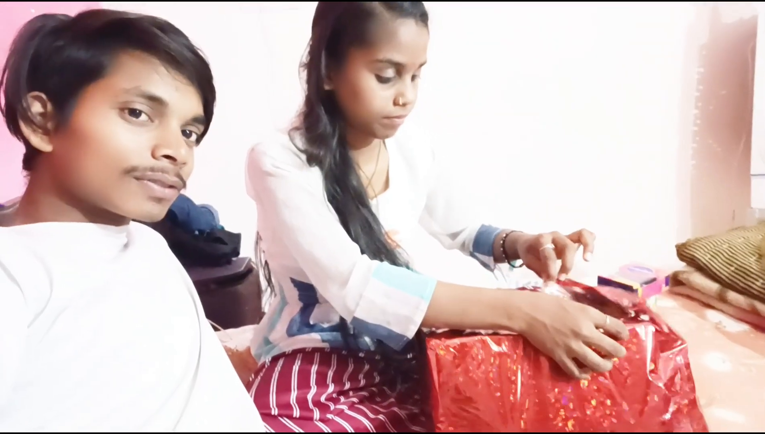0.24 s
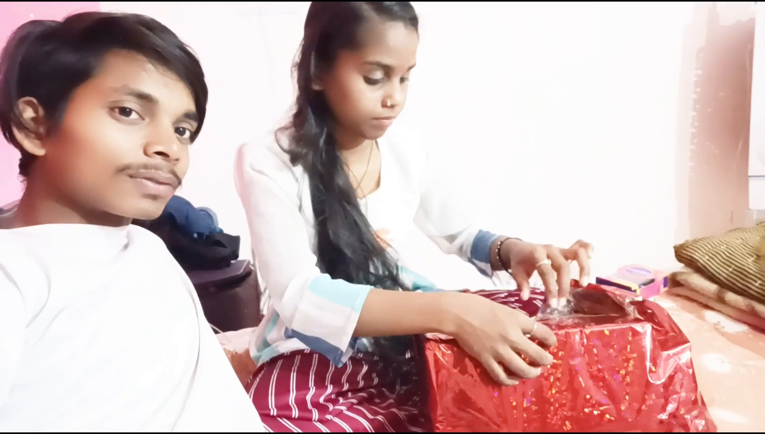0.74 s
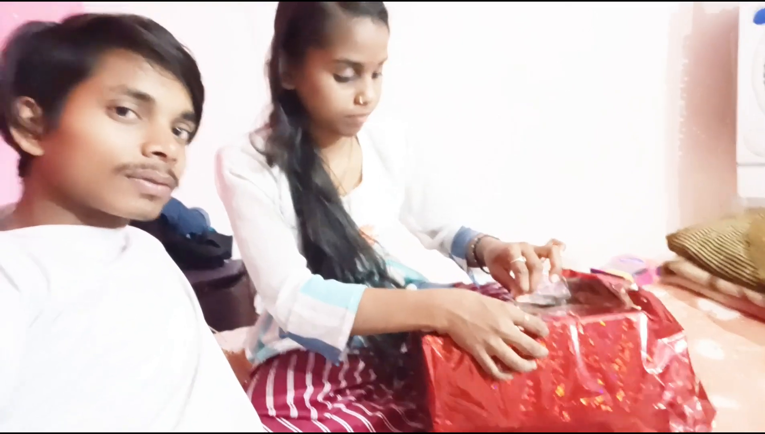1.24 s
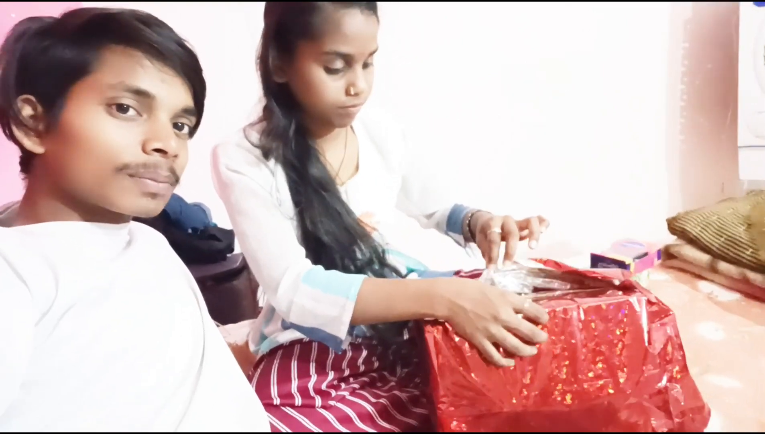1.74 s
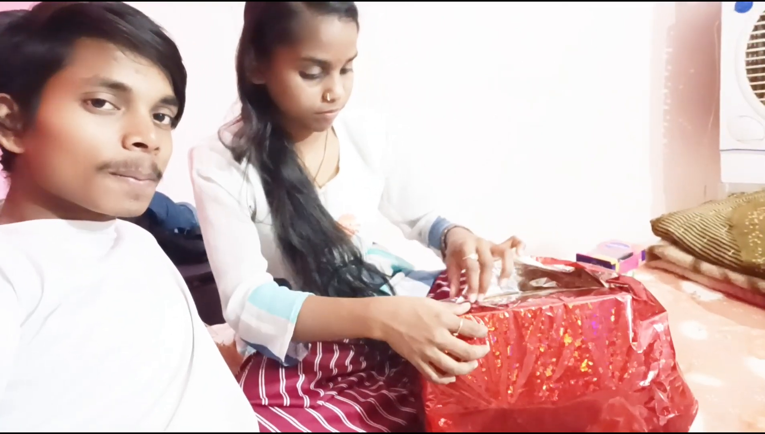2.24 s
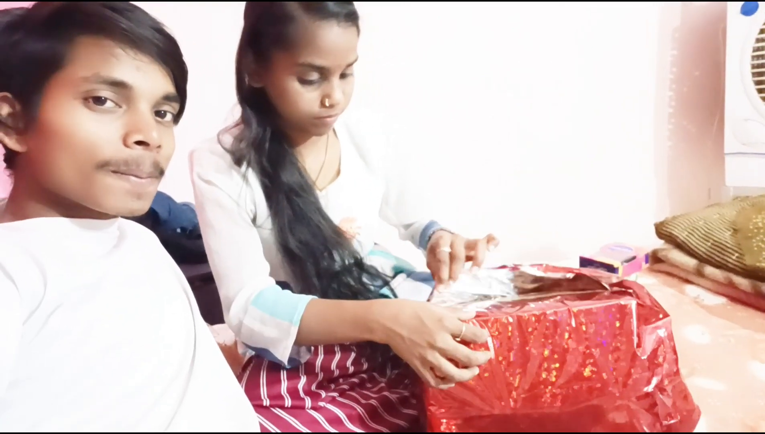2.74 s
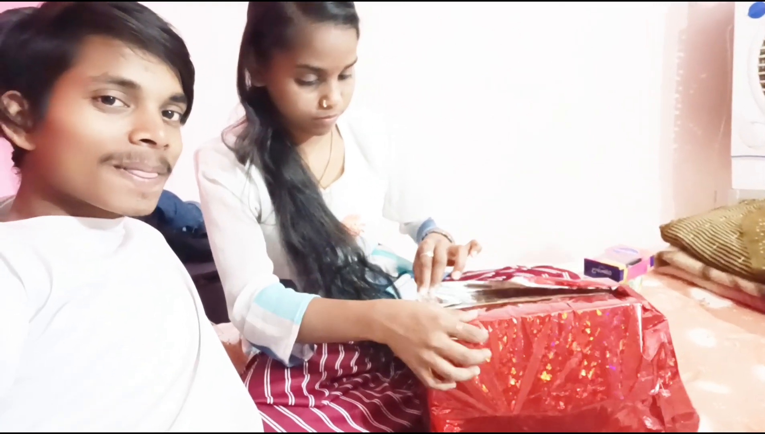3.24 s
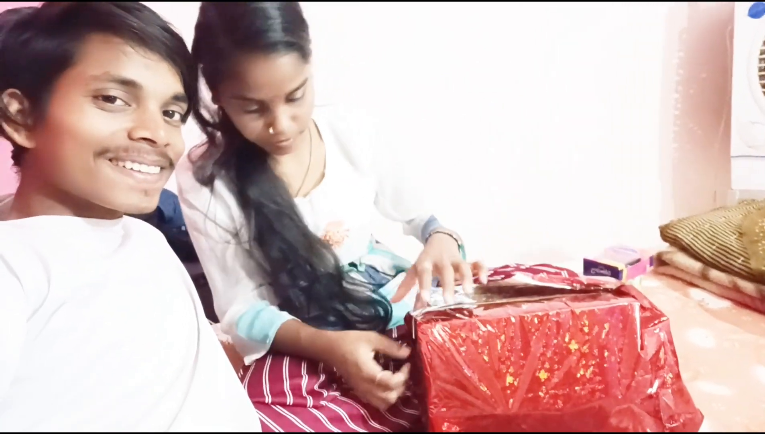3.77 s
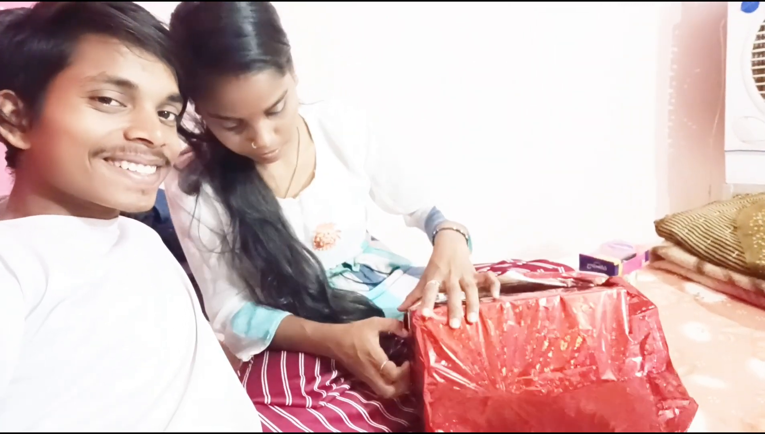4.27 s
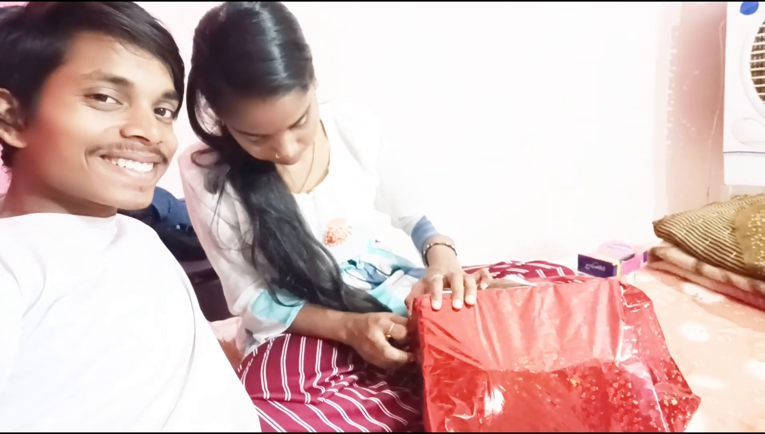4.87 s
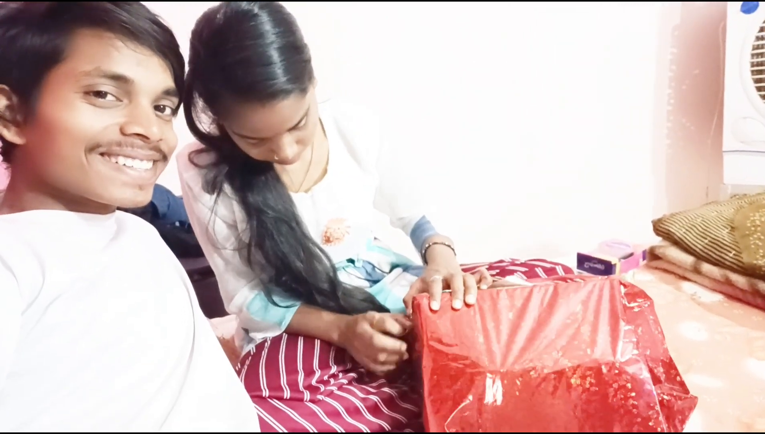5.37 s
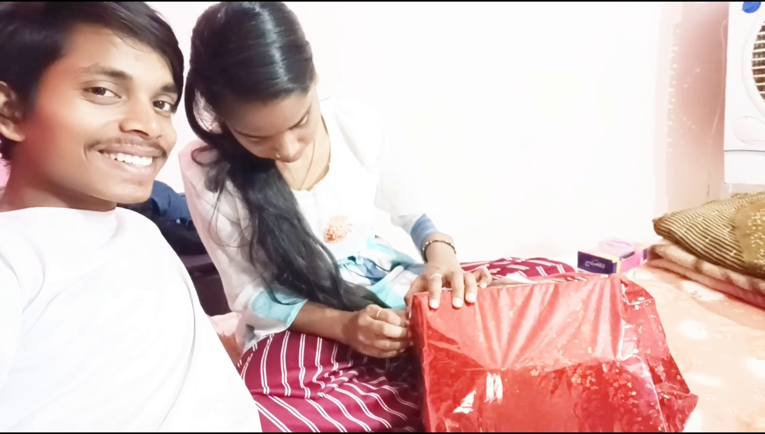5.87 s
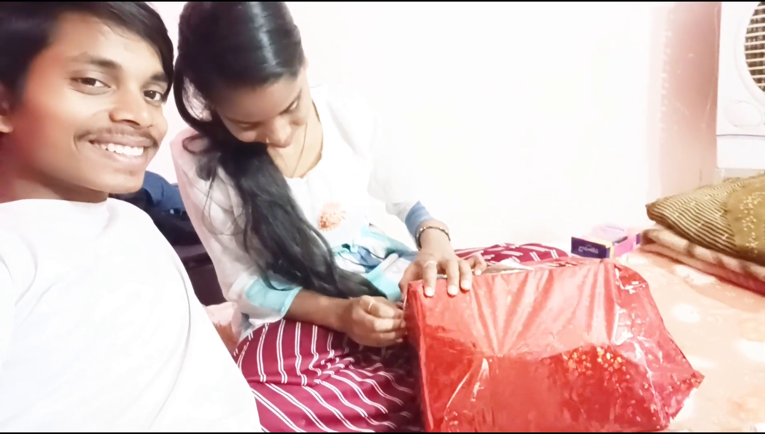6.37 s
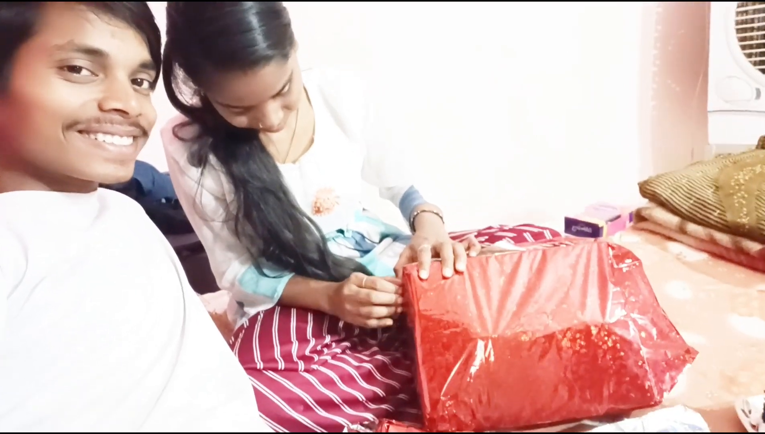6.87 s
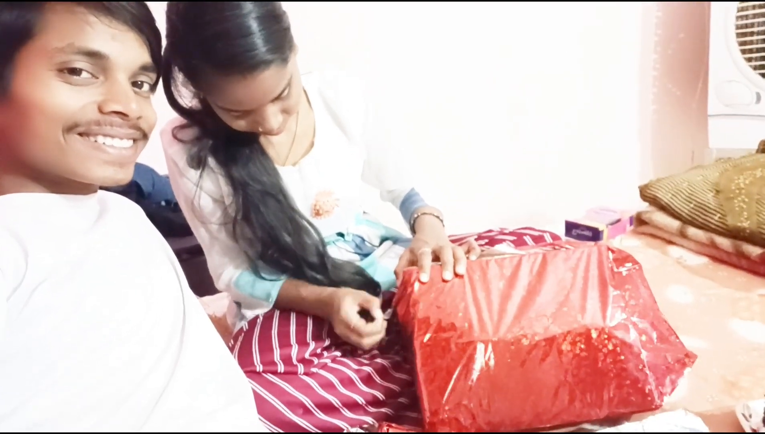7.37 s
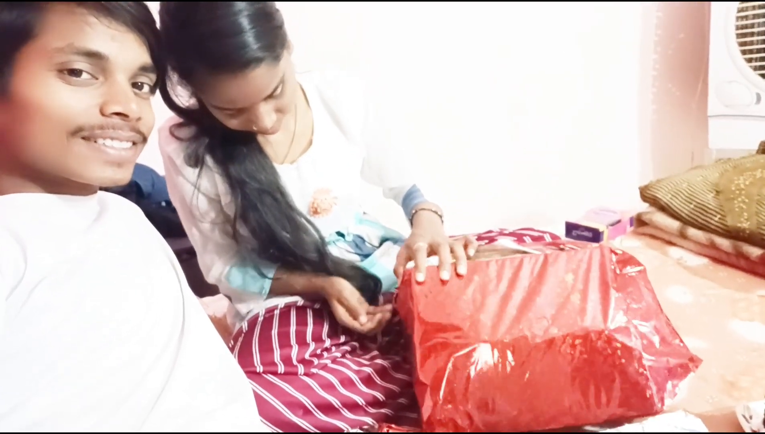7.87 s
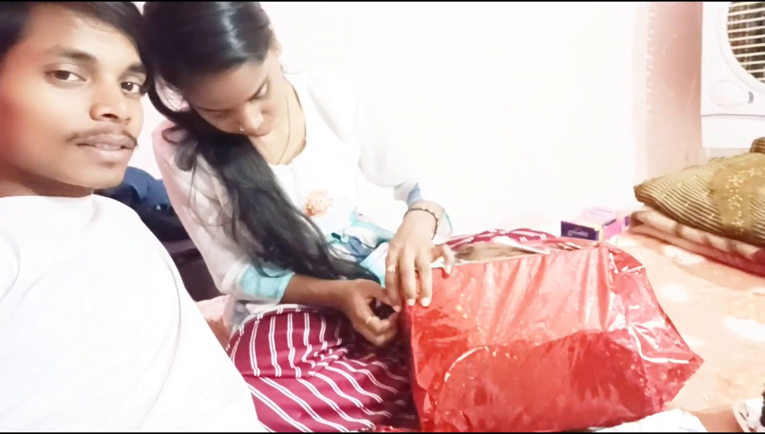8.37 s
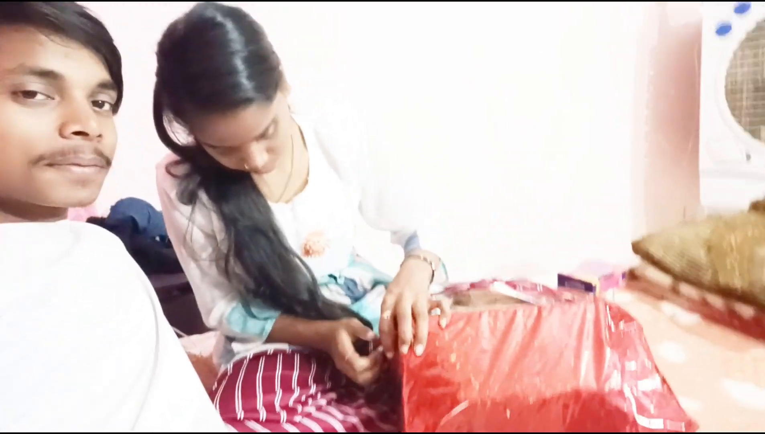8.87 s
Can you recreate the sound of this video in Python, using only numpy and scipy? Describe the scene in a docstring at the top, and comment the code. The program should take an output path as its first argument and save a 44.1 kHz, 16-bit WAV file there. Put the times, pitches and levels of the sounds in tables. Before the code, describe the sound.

Close stereo phone pickup, slightly stronger on the right: crisp metallic wrap crackles in bursts separated by near-quiet gaps. Creases pop brightly, loose flaps boom softly, taut film gives tiny squeaks around two and a half seconds, and the box bumps on soft bedding. The middle is thin and quiet; sharp snaps erupt at five, six and seven and a half seconds, each leaving a short bright echo from bare walls.

```python
"""Foil crackles finely and snaps loudly, tape rasps, and a box drums and bumps in a ringing bare room. Hands
pull metallic gift wrap off a cardboard box, to the right of a phone with two microphone ports. Crackle, snaps
and tape are bursts of short noisy clicks; tape ripped off the box sends random ticks into panel tones. Flexing
flaps boom, taut film squeaks, and the box thuds on the bedding; the walls ring for about half a second, over
faint room air and hiss."""
import sys
import numpy as np
from scipy import signal
from scipy.fft import rfft, irfft, next_fast_len
from scipy.io import wavfile
from scipy.ndimage import uniform_filter1d, map_coordinates

SR = 44100
rng = np.random.default_rng(int(sys.argv[2]) if len(sys.argv) > 2 else 0)


def digitize_waveform(pressure):
    """Quantize a signal to 16-bit integers and store it at the path in sys.argv[1].

    Rows of a 2-D input are taken as channels; values are limited to [-1, 1].
    """
    field = np.atleast_2d(pressure).T
    bounded = np.clip(field, -1, 1)
    quanta = np.round(bounded * 32767).astype(np.int16)
    wavfile.write(sys.argv[1], SR, quanta)


N = 402182  # length in samples
REST_DB = -82.5  # relative level at rest: resting hands still stir the wrap


def amp(db):
    """Turn decibels into a plain multiplier."""
    return 10 ** (np.asarray(db) / 20)


def unit(x):
    """Scale a sound to an average (RMS) level of 1."""
    return x / np.sqrt(np.mean(x ** 2) + 1e-20)


def along(points, hz):
    """Read a curve given as (Hz, value) points, with pitch spaced as the ear hears it (log axis)."""
    f, value = np.transpose(points)
    return np.interp(np.log(hz + 1), np.log(f + 1), value)


def curves(rows):
    """Join the rows with straight lines: one value per sample for each column after the time."""
    s, *columns = np.transpose(rows)
    return [np.interp(np.arange(N) / SR, s, column) for column in columns]


def wobble(rate):
    """Make a smooth random curve with so many random knots a second."""
    knots = rng.standard_normal(int(N * rate / SR) + 4)
    return map_coordinates(knots, [np.arange(N) * rate / SR])


def swell(u):
    """A quick rise and a slower fall over u = 0..1, top near 1."""
    return 1.25 * np.sqrt(np.sin(np.pi * u) * (1 - u) + 1e-12)


def filtered(x, response):
    """Change strength and timing of each frequency by a complex response."""
    m = next_fast_len(N + SR // 2)
    return irfft(rfft(x, m) * response(np.fft.rfftfreq(m, 1 / SR)), m)[..., :N]


def coloured(x, points, size=1024):
    """Shape the tone by (Hz, dB) points, with a filter that never sounds ahead of its input."""
    gain = amp(along(points, np.fft.rfftfreq(size, 1 / SR)))
    # folding the cepstrum packs the filter's energy at its start (minimum phase)
    cepstrum = irfft(np.log(gain))
    cepstrum[1:size // 2] *= 2
    cepstrum[size // 2 + 1:] = 0
    kernel = irfft(np.exp(rfft(cepstrum)))
    return signal.oaconvolve(x, kernel[None], axes=1)[:, :x.shape[1]]


def ticks(rate, spread_db):
    """Random impulses, rate a second: sizes vary in dB, and mean power is about 1."""
    size = amp(spread_db * np.minimum(rng.exponential(size=N), 3.5)) * rng.choice([-1, 1], N)
    happens = rng.random(N) < rate / SR
    return unit(happens * size / np.sqrt(rate))


def efforts(rows, attack_s, ease_db_per_s, release_db_per_s):
    """Events rise, ease and die away: their joint level, and their traits averaged by power."""
    t = np.arange(0, N, 64) / SR  # one step every 64 samples
    start, hold, db, *traits = np.transpose(rows)[..., None]
    age = np.maximum(t - start, 0)
    fall_db = ease_db_per_s * age + release_db_per_s * np.maximum(age - hold, 0)
    power = (np.minimum(age / attack_s, 1) * amp(db - fall_db)) ** 2
    total = power.sum(0) + amp(REST_DB) ** 2
    mean_traits = [(power * trait).sum(0) / total for trait in traits]
    return curves(np.column_stack([t, 10 * np.log10(total)] + mean_traits))


def buckle(hz, ring, t60, flutter_db, size=700):
    """One facet flips: a crack, a short ring at its pitch, then the sheet around it flutters."""
    t = np.arange(size) / SR
    onset = 1 - np.exp(-t / 0.00022)
    tone = np.sin(2 * np.pi * hz * t) * amp(-60 * t / t60)
    # partly shared by the two ports, partly separate
    noise = rng.standard_normal(size) + 1.06 * rng.standard_normal((2, size))
    crack = noise * (amp(-60 * t / .002) + amp(flutter_db - 60 * t / .018))
    x = ring * unit(tone * onset) + unit(crack * onset)
    return unit(x) / np.sqrt(size)


def patchy(x, depth_db, width_hz, life):
    """The sheet's resonances come and go as it changes shape."""
    hz, t, z = signal.stft(x, SR, nperseg=512)
    knots = rng.standard_normal((300, 900))
    place = np.meshgrid(np.sqrt(hz * 1000) / width_hz, t / life, indexing="ij")
    field = map_coordinates(knots, place, mode="wrap")
    depth = depth_db / (1 + hz / 8000)  # the treble has too many modes to stand out
    return signal.istft(z * amp(depth[:, None] * field), SR, nperseg=512)[1][:, :N]


def crackle(count=18):
    """Small facets buckle at random, more in louder swells; slack sheet rustles, taut sheet sizzles."""
    # swells of crackle, some from hands, some lingering after loud snaps: start t/s, hold/s,
    # relative crackle level/dB, low rustle of slack sheet/dB, treble lift of taut sheet/dB
    crackle_swells = [(-0.02, 0.043, -44.5, -1, -0.5), (0.037, 0.49, -38.5, -1.5, -0.5),
                      (0.672, 0.021, -45, -14, -0.5), (0.865, 0.037, -61, -20, 2.5),
                      (1.165, 0.16, -53, -30, -1.5), (1.305, 0.41, -33.5, -15.5, 0),
                      (1.75, 0.16, -36.5, -11.5, -2), (1.93, 0.19, -47, -27, 1.5),
                      (2.39, 0.011, -58.5, -18, 6.5), (2.48, .05, -61.5, -3.5, 3.5),
                      (2.555, .08, -45, -10, -1.5), (2.675, 0.29, -33.5, -4.5, -0.5),
                      (3.03, 0.063, -27, -5, -1.5), (3.15, 0.23, -37.5, -10, -2),
                      (3.45, 0.088, -41, -26.5, -5.5), (4.01, 0.021, -63, 0, 8),
                      (4.122, 0.027, -51, -11, -3.5), (4.265, 0.19, -49.5, -13, 0),
                      (4.44, 0.43, -43, -10.5, 0), (4.935, 0.046, -40, -8.5, 4), (5.035, .03, -39.5, -8, 3),
                      (5.085, .16, -35, -6.5, 6.5), (5.32, 0.24, -39, -7, 2), (5.745, 0.12, -49, -13, 4),
                      (5.915, 0.042, -42.5, -16.5, -2), (6.03, 0.073, -38.5, -5, 5.5),
                      (6.18, 0.17, -43.5, -17.5, 0.5), (6.44, .02, -50.5, -18, 4),
                      (6.52, 0.14, -41.5, -16, 0), (6.815, 0.03, -39, -3, -2), (7.28, .04, -67.5, -8, 7),
                      (7.368, .03, -42, -0.5, -2), (7.41, .17, -30, -3, 0.5),
                      (7.63, 0.11, -28.5, -14.5, -2.5), (7.865, 0.051, -42.5, -12, -5),
                      (8.035, 0.036, -33, 0, -12.5), (8.2, 0.19, -49.5, -32, -1),
                      (8.42, .1, -51.5, -25, -4.5), (8.56, 0.11, -44.5, -26, -4.5),
                      (8.79, 0.24, -45, -7, -14), (9.09, 0.045, -43, -2.5, -9)]
    # colour of the fine crackle: f/Hz, gain/dB
    foil_colour = [(100, -30), (300, -42.5), (550, -9.5), (900, -7), (1400, 0), (2100, -0.5), (3200, -1),
                   (5600, -2), (10000, -2), (15500, 1)]
    # colour of the broad folds: f/Hz, gain/dB
    rustle_colour = [(120, -32.5), (300, -7), (480, -1.5), (600, -6), (800, -2), (1100, -1), (1500, -4.5),
                     (2200, -9.5), (4000, -14.5)]
    level_db, slack_db, taut_db = efforts(
        crackle_swells, attack_s=0.02, ease_db_per_s=10, release_db_per_s=168.5)
    rate = 1000 * amp(.25 * (level_db + 39.5))  # flips a second, all pitches together
    facets = np.zeros((2, N))
    for hz in np.linspace(2900, 6400, count):
        facet = buckle(hz, ring=0.33, t60=0.004, flutter_db=-14.5)
        flips = ticks(rate / count, spread_db=4.0)
        facets += signal.oaconvolve(flips[None], facet, axes=1)[:, :N]
    rustle = amp(slack_db) * unit(coloured(facets, rustle_colour))
    sheet = unit(coloured(facets, foil_colour)) + rustle
    treble = filtered(sheet, lambda hz: hz ** 4 / (hz ** 4 + 4500 ** 4))
    sheet = sheet + (amp(taut_db) - 1) * treble
    sheet = patchy(sheet, depth_db=4.5, width_hz=85, life=.035)
    return sheet * amp(level_db + 1.2 * wobble(45) + 1.04)


def pop(hz, ring, t60, flutter_db, flutter_t60, size=700):
    """A big crease flips: one sharp swing, a short ring, then the flutter of the sheet around it."""
    t = np.arange(size) / SR
    wave = np.sin(2 * np.pi * hz * t)
    swing = wave * amp(-60 * t / 0.0028)
    tone = wave * amp(-60 * t / t60)
    noise = rng.standard_normal(size) + 0.96 * rng.standard_normal((2, size))
    crack = noise * (amp(-60 * t / .003) + amp(flutter_db - 60 * t / flutter_t60))
    return unit(ring * (unit(swing) + 0.49 * unit(tone)) + unit(crack)) / np.sqrt(size)


def snaps(size=700):
    """Each crease beams its pitch at the phone and scatters a less tonal crack to the walls."""
    # single creases popping through: t/s, relative level/dB, facet pitch f/Hz,
    # body at 900 Hz/dB, edge at 11 kHz/dB
    creases = [(0.0444, -19, 3120, -2, 12), (0.329, -19.5, 3220, 9, 13.5), (0.6815, -24.5, 3140, -7, 0),
               (1.3052, -12, 5230, -3, 4.5), (1.3893, -12.5, 1880, 1.5, 7.5), (1.5713, -16.5, 5170, 7.5, 8),
               (1.6269, -19.5, 5090, 12.5, 11), (1.766, -17, 2230, -4, 3), (1.862, -23, 5960, 0.5, 15),
               (2.6253, -23.5, 3090, 2, -1), (2.6587, -24, 3740, 6, -4), (2.6842, -16, 5100, 4, 11),
               (2.8655, -19, 5280, 10, 0), (2.9106, -16.5, 3070, -4, 10), (2.9774, -17, 3260, -8, 1),
               (3.022, -8, 3040, 12.5, 10), (3.482, -19.5, 3210, -18, 11), (3.5692, -20.5, 3250, -18, -9),
               (4.2707, -36.5, 3370, -17, 8.5), (4.3324, -34, 3280, -9, 7), (4.4607, -26, 5930, 0, 12),
               (4.6084, -40, 2930, -12, 1), (4.804, -31, 3500, 13, 8), (4.8967, -22, 3040, 2, 3),
               (4.9581, -18, 5900, 3, 8.5), (5.032, -6, 6330, -1.5, 1.5), (5.089, -4, 3500, -7, -3),
               (5.19, -6, 3250, 3, -10), (5.3146, -7, 3500, -10, 1), (5.8715, -30, 3080, -7, 4),
               (5.9256, -25.5, 2900, -1, 4), (6.027, -8, 6100, -4.5, 6), (6.1988, -11, 5930, -10, 3.5),
               (6.314, -28, 5360, -9, -3.5), (6.361, -21, 3200, -19, -8), (6.5336, -27.5, 3320, -14.5, 1),
               (6.553, -25.5, 3080, -11, 3), (6.5967, -26.5, 2980, -3.5, -7), (6.6882, -29, 5570, -4, 7),
               (6.7643, -31, 3280, -20, 3.5), (6.814, -5, 3160, -4, -5.5), (6.824, -23, 5800, 7, 4),
               (7.1953, -43, 6450, -7.5, 6), (7.379, -24.5, 3550, 6, 13.5), (7.3932, -12, 6060, -3, 3),
               (7.4074, -10.5, 3160, 5.5, 6), (7.4107, -5, 6060, -24, 5), (7.435, -6.5, 3120, -11, 5),
               (7.4392, -7, 3260, -19, 8), (7.4653, -6, 3600, -2, 2), (7.4853, -9, 3170, -12, 3),
               (7.492, -12, 3190, -2, -2), (7.5119, -9.5, 3820, 3, -8), (7.7116, -12, 3140, -9, 7),
               (7.827, -16.5, 3060, -5, -4), (7.887, -16, 3080, -1, 3), (8.0358, -4.5, 3960, 3, -4),
               (8.5624, -18.5, 2460, -13.5, -8), (8.5903, -21.5, 3250, -6, -1), (8.7385, -29, 3250, -26, 4),
               (8.777, -21, 3280, -18, 0), (8.8062, -21.5, 3060, -3, -1), (8.8158, -22.5, 6140, -4, 11.5),
               (8.8516, -6.5, 3350, -2, -2), (8.8971, -14, 2940, 8.5, 1), (8.9057, -14.5, 3400, 8, -15)]
    beam_db, scatter_db = 13.5, 11  # added towards the phone and towards the walls
    bass_under_body_db = -29.5  # level at 120 Hz against the body
    flip_s = 0.00023  # time constant of a crease flipping
    beamed, scattered = np.zeros((2, 2, N + SR))
    flip = 1 - np.exp(-np.arange(size) / SR / flip_s)
    for s, db, hz, body_db, edge_db in creases:
        bass_db = body_db + bass_under_body_db
        tilt = [(120, bass_db), (900, body_db), (2800, 0.00052), (6000, 0), (11000, edge_db)]
        near = pop(hz, ring=.4, t60=.008, flutter_db=-12, flutter_t60=.022)
        near = coloured(near, tilt) * flip
        wide = pop(hz, ring=0.14, t60=.004, flutter_db=-20.5, flutter_t60=0.015)
        wide = coloured(wide, tilt)
        start = round(s * SR)
        beamed[:, start:start + size] += amp(db + beam_db) * near
        scattered[:, start:start + size] += amp(db + scatter_db) * wide
    return beamed[:, :N], scattered[:, :N]


def tape():
    """At each tug the glue lets go in a fast, uneven run of tiny slips."""
    # tugs that peel the tape: start t/s, hold/s, relative level/dB
    tugs = [(7.625, .065, -23), (7.743, 0.022, -26.5)]
    # colour of the peeling: f/Hz, gain/dB
    tape_colour = [(300, -29.5), (1000, -7), (3000, 1.5), (6000, 0), (10000, 3), (13000, 11.5), (15500, 15)]
    level_db, = efforts(tugs, attack_s=0.019, ease_db_per_s=60, release_db_per_s=600)
    slip_rate = 1100 * amp(3.1 * wobble(400))  # slips a second, wandering around 1100
    turns = np.cumsum(slip_rate) / SR
    # one slip each time the running count passes a whole number
    slips = np.diff(np.floor(turns), prepend=0) * amp(1.7 * rng.standard_normal(N))
    click = buckle(5700, ring=0.22, t60=0.0021, flutter_db=4)
    rasp = signal.oaconvolve(slips[None], click, axes=1)[:, :N]
    peeling = level_db > REST_DB + 10  # silent between tugs
    return coloured(unit(rasp), tape_colour) * amp(level_db - 1.5) * peeling


def box():
    """Stick-slip of tape ripping off the box, as random ticks, drums on the resonant cardboard panels."""
    # tape ripped off the box: start t/s, hold/s, relative drumming level/dB
    drags = [(0.0, 0.077, -51), (0.13, 0.28, -38.5), (1.325, 0.36, -34.5), (1.8, 0.14, -63),
             (2.467, 0.16, -40), (2.69, 0.46, -36.5), (4.72, .03, -55), (5.11, 0.078, -49),
             (5.58, 0.024, -44), (6.81, .035, -40.5), (7.39, 0.18, -38), (7.88, .05, -50.5),
             (8.025, 0.043, -32), (8.88, 0.037, -59)]
    # cardboard panel resonances: f/Hz, width/Hz, gain/dB
    panel_modes = [(134, 35, -11), (195, 30, -1.5), (270, 53, 1), (345, 84, 2), (427, 210, -7)]
    level_db, = efforts(drags, attack_s=.018, ease_db_per_s=3, release_db_per_s=220.5)

    def panels(f):
        """Add up the resonance peaks, with alternating sign."""
        total = 0
        for k, (centre, width, db) in enumerate(panel_modes):
            damping = 1j * f * width
            total = total + (-1) ** k * amp(db) * damping / (centre ** 2 - f ** 2 + damping)
        return total

    return unit(filtered(ticks(400, spread_db=1.5), panels)) * amp(level_db - 7)


def flexes(width=0.15):
    """A bending flap booms in a narrow band that slides down as its tension goes."""
    # a loose flap flexes: start t/s, relative level/dB, length/s, middle pitch f/Hz
    bends = [(0.03, -48.5, 0.18, 486), (0.175, -56, 0.1, 298), (1.38, -36, 0.19, 201.3),
             (1.665, -40, .049, 335), (2.707, -38.5, 0.077, 356), (2.85, -44.5, 0.23, 139.8),
             (3.378, -56.5, 0.085, 392), (4.083, -62.5, 0.056, 855), (4.282, -61, .11, 787),
             (4.447, -53.5, .1, 564), (4.719, -44, .08, 381.5), (4.931, -44.5, .07, 830),
             (5.33, -47, 0.076, 462), (5.507, -44.5, 0.053, 756), (5.576, -44.5, 0.044, 453),
             (6.057, -46.5, 0.069, 477), (6.308, -47.5, .03, 960), (6.547, -47.5, .02, 613),
             (6.602, -52, 0.1, 803), (6.81, -46, 0.09, 335), (7.45, -42, .14, 480),
             (7.88, -52.5, 0.067, 330), (8.052, -40, 0.071, 147), (8.896, -41, 0.098, 343.6)]
    pitch_fall = .75  # end pitch over start pitch
    out = np.zeros(N + SR)
    for s, db, length, hz in bends:
        u = np.linspace(0, 1, int(length * SR))
        turns = np.cumsum(hz * pitch_fall ** (u - .5)) / SR
        # two slow random curves blur the tone into a narrow band
        knots = rng.standard_normal((2, 80))
        a, b = (map_coordinates(k, [turns * width * 2], mode="wrap") for k in knots)
        boom = (a + 0.27) * np.sin(2 * np.pi * turns) + b * np.cos(2 * np.pi * turns)
        out[round(s * SR):][:len(u)] += amp(db - 2.5) * swell(u) * unit(boom)
    return out[:N]


def squeaks(count=12):
    """Taut film squeaks in stick-slip: uneven slips give a short, rough stack of overtones."""
    # squeaks: start t/s, relative level/dB, length/s, mean slip rate f/Hz, unevenness (0-1)
    slips = [(0.682, -61, 0.025, 420, 0.25), (2.56, -37.5, 0.024, 400, 0.05),
             (2.719, -36, 0.063, 240, 0.14), (3.662, -62.5, 0.13, 1850, 0.04),
             (4.128, -51.5, 0.033, 760, 0.06)]
    overtone_colour = [(350, -13.5), (900, 3.5), (2300, 8.5), (4000, -6.0), (7000, -39.0)]  # f/Hz, gain/dB
    out = np.zeros(N + SR)
    for s, db, length, hz, uneven in slips:
        u = np.linspace(0, 1, int(length * SR))
        knots = rng.standard_normal((2, 60))
        drift, grip = (map_coordinates(k, [u * length * 300], mode="wrap") for k in knots)
        turns = np.cumsum(hz * (1 + uneven * drift)) / SR
        stack = np.zeros(len(u))
        for k in range(1, count):
            stack += amp(along(overtone_colour, k * hz)) * np.sin(2 * np.pi * k * turns)
        out[round(s * SR):][:len(u)] += amp(db + 0.5) * swell(u) * unit(stack * amp(2.4 * grip))
    return out[:N]


def bumps():
    """Soft thuds of the box on the bedding; the room's low modes reach each port in a different phase."""
    # the box shifting on the bedding: t/s, relative level/dB, lower pitch f/Hz
    shifts = [(0.3, -56, 86), (0.589, -61, 59), (1.422, -45.5, 112), (1.559, -46.5, 84.6),
              (1.96, -50, 66.3), (2.851, -42, 108.6), (3.02, -50, 85), (5.088, -57, 71), (6.341, -56, 67.6),
              (7.491, -50, 78.4), (8.04, -45, 103.8), (8.43, -56.5, 66)]
    out, t = np.zeros((2, N + SR)), np.arange(SR // 2) / SR
    for s, db, hz in shifts:
        phase = rng.normal(0, .45, (2, 2, 1))  # for each of two tones, at each port
        thud = np.sin(2 * np.pi * hz * t + phase[0])
        thud = thud + 0.71 * np.sin(2 * np.pi * 1.4 * hz * t + phase[1])
        envelope = amp(db - 60 * t / 0.39) * (1 - np.exp(-t / .012))
        start = round(s * SR)
        out[:, start:start + len(t)] += envelope * thud
    return out[:, :N]


def diffuse(pair):
    """Blend two unrelated signals so that the ports are more or less alike at each frequency."""
    # left-right likeness of diffuse sound: f/Hz, correlation (0-1)
    alike = [(40, 0.039), (80, 0.72), (150, 0.059), (400, 0.65), (1000, 0.092), (2500, 0)]
    hz = np.fft.rfftfreq(pair.shape[1], 1 / SR)
    turn = np.arccos(np.clip(along(alike, hz), -1, 1)) / 2
    mid, side = irfft(rfft(pair) * [np.cos(turn), np.sin(turn)], pair.shape[1])
    return np.array([mid + side, mid - side])


def room(x, count=6):
    """Bare walls answer with fading noise, cycling through random patterns to keep the tone even."""
    # ring time of the room: f/Hz, time to fall by 60 dB/s
    ring_time = [(100, 0.29), (300, 0.32), (800, 0.52), (2000, 0.56), (5000, 0.58), (15000, 0.41)]
    out = np.zeros((2, N))
    turn = np.floor(np.arange(N) / SR / .23)  # the echo takes the next pattern every 0.23 s
    for k in range(count):
        hz, t, z = signal.stft(rng.standard_normal((2, int(.7 * SR))), SR, nperseg=256)
        fading = z * amp(-60 * t / along(ring_time, hz)[:, None])
        tail = signal.istft(fading, SR, nperseg=256)[1]
        # the echo begins after 3 ms and builds up over 4.6 ms
        build_up = np.clip((np.arange(tail.shape[1]) / SR - .003) / 0.0046, 0, 1)
        tail = diffuse(tail * build_up)
        active = turn % count == k
        echo = signal.fftconvolve((x[1] * active)[None], tail / np.linalg.norm(tail[0]), axes=1)
        out += echo[:, :N]
    return out


def air():
    """Room air and hiss: steady noise, partly alike at the two ports."""
    # colour of room air and hiss: f/Hz, gain/dB
    quiet_colour = [(25, -10.5), (65, -2.5), (120, -4), (300, -9.5), (800, -7.5), (3000, -13.5),
                    (6000, -23), (9000, -11.5), (15500, -22)]
    noise = diffuse(rng.standard_normal((2, N)))
    return amp(-67) * unit(coloured(noise, quiet_colour))


def scene():
    """Foil is heard about equally directly and off the walls; direct snaps favour the right port."""
    fine = crackle() + tape()
    beamed, scattered = snaps()
    low = box() + flexes() + squeaks()
    # the left port, farther away, hears these 0.08 ms later
    delay_s = np.array([[.00008], [0]])
    low = filtered(low, lambda hz: np.exp(-2j * np.pi * hz * delay_s))
    direct = fine * amp([[-6], [-3]]) + beamed * amp([[-4], [1]]) + amp(-2.5) * low
    echo = room(amp(-4.0) * fine + amp(-5.0) * scattered + amp(-7.5) * low)
    # the hands work across the box towards the right port
    lean_db = np.interp(np.arange(N) / SR, [0, 5], [-1.2, .2])
    wrap = (direct + echo) * amp([-lean_db, lean_db])
    return wrap + bumps() * amp([[-1.5], [1]]) + air()


def suppressor(x, threshold_db=-95, depth_db=-10):
    """The phone turns down any band whose level sinks near its hiss."""
    hz, t, z = signal.stft(x, SR, nperseg=1024)
    # average power over 5 neighbouring bands, then 3 moments
    power = uniform_filter1d(np.abs(z) ** 2, size=5, axis=1)
    power = np.abs(uniform_filter1d(power, size=3, axis=2))
    # added to the threshold: f/Hz, level/dB
    offset = [(100, -24.0), (500, 13), (2000, 17.0), (7000, 16.5), (10000, -22.5)]
    threshold = amp(threshold_db + along(offset, hz)[:, None]) ** 2
    openness = power ** 2 / (power ** 2 + threshold ** 2)
    gain = amp(depth_db) + (1 - amp(depth_db)) * openness
    return signal.istft(z * gain, SR, nperseg=1024)[1][:, :N]


def record(dry):
    """Each port has its own colour; the phone hushes faint sound and cuts steeply above its band limit."""
    # colour of the left microphone port: f/Hz, gain/dB
    left_port = [(250, -1), (1000, -2.5), (1900, -2.5), (3300, -1), (5700, -4), (6700, -7.5), (8300, -1),
                 (10500, -4.5), (12500, -6), (15400, -2)]
    # colour of the right microphone port: f/Hz, gain/dB
    right_port = [(250, -2.5), (1000, -2), (2000, 0.5), (3100, 5), (4500, 2), (5300, 6), (6000, 6),
                  (6700, -3), (8000, -7), (9200, -16), (11000, -21.5), (13000, -10.5), (15400, -4.5)]
    top_hz = 15900
    ports = np.vstack([coloured(dry[:1], left_port), coloured(dry[1:], right_port)])
    return filtered(suppressor(ports), lambda hz: 1 / (1 + (hz / top_hz) ** 200))


dry = scene()
out = record(dry)
digitize_waveform(out)
```